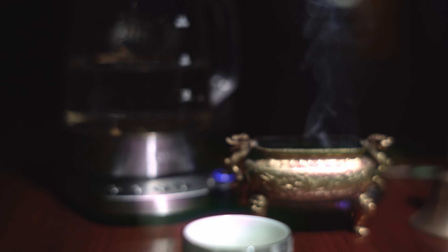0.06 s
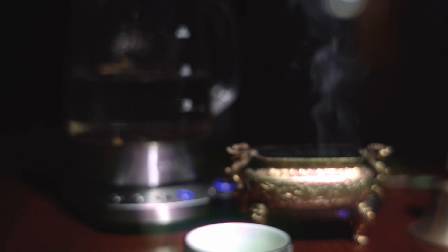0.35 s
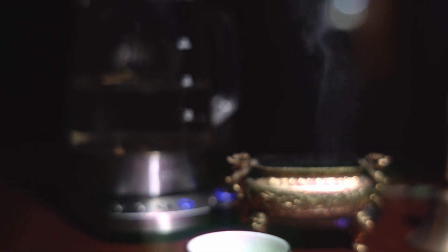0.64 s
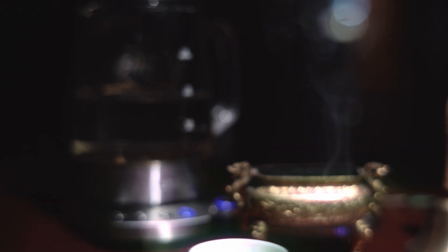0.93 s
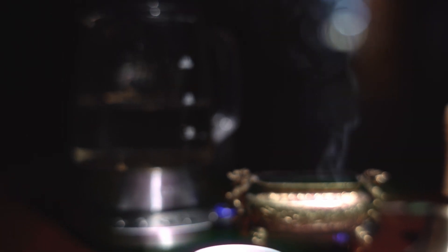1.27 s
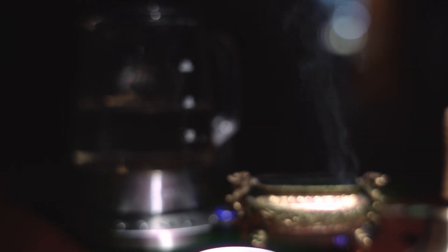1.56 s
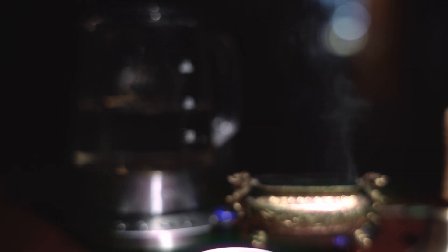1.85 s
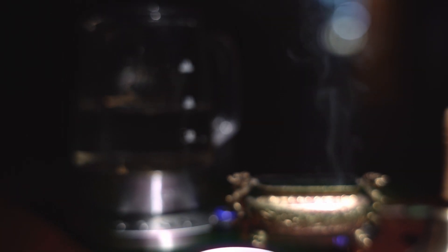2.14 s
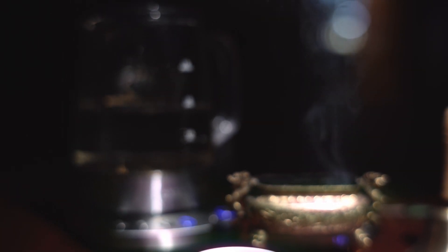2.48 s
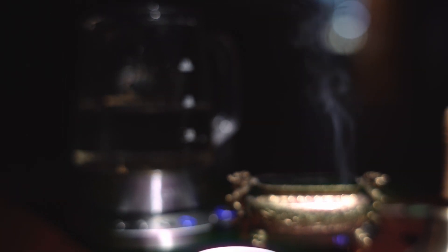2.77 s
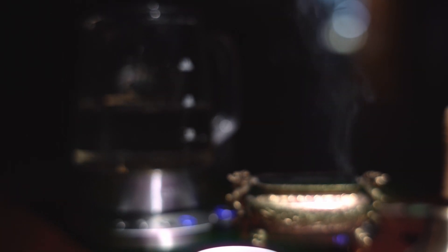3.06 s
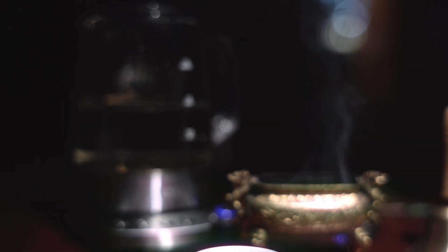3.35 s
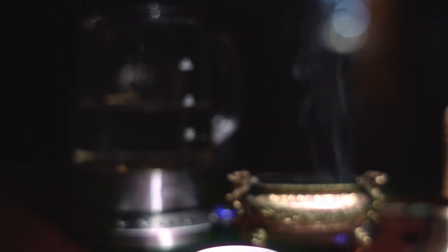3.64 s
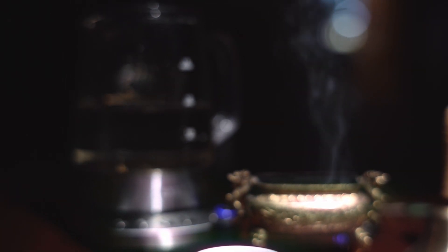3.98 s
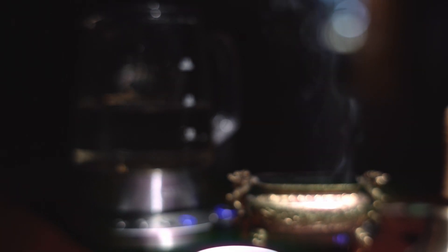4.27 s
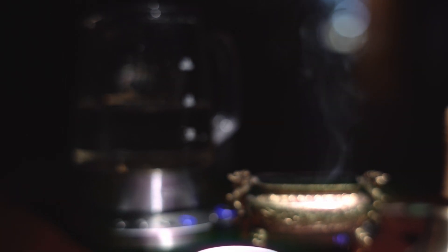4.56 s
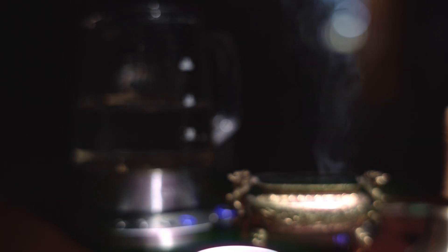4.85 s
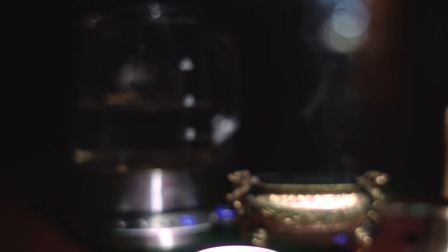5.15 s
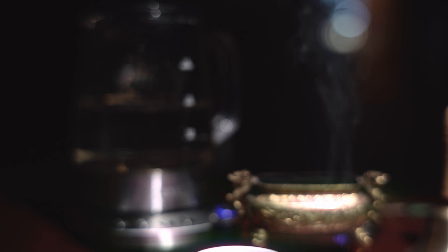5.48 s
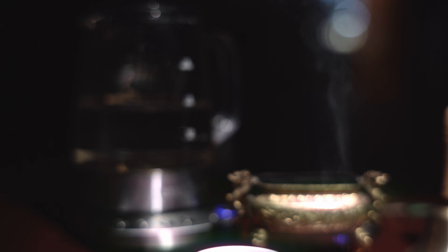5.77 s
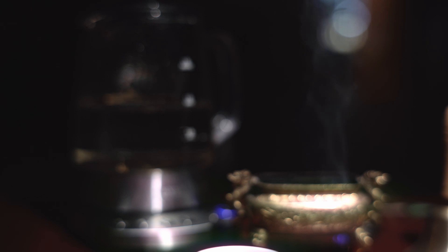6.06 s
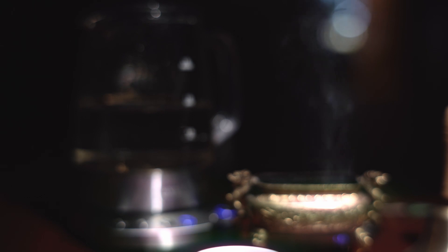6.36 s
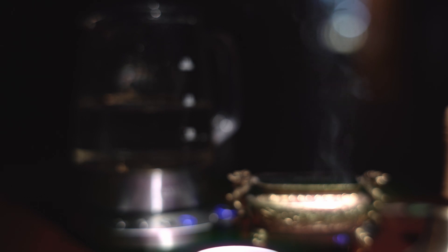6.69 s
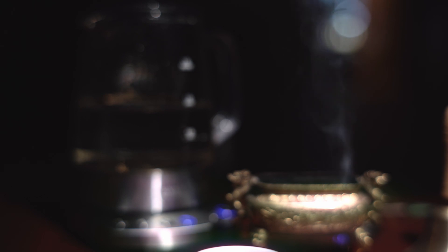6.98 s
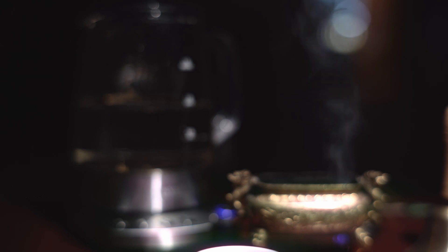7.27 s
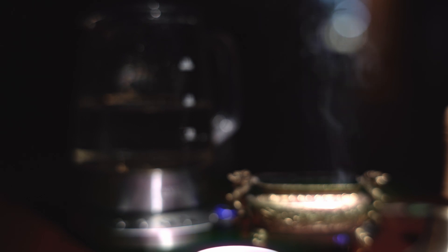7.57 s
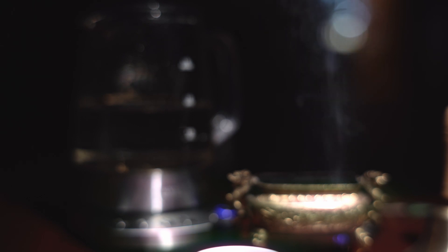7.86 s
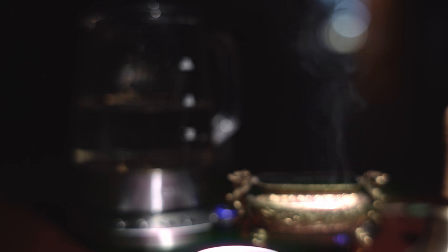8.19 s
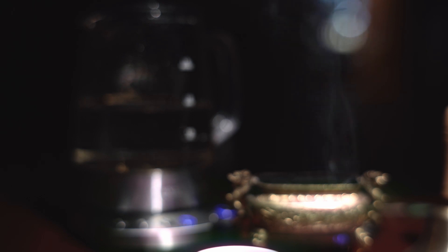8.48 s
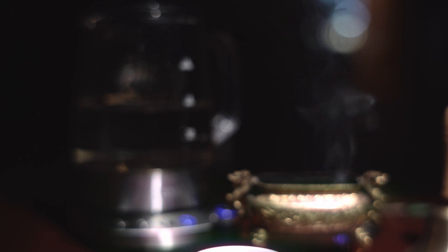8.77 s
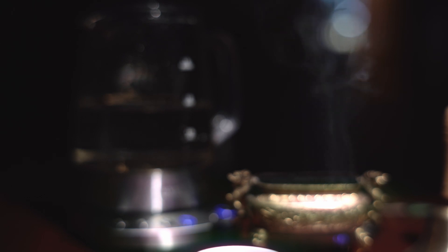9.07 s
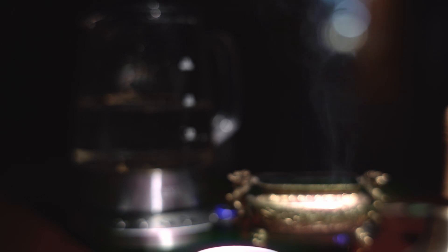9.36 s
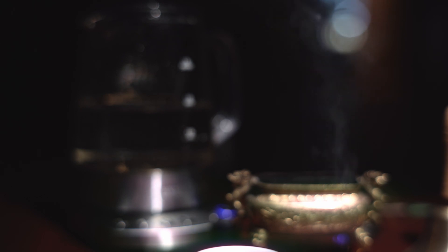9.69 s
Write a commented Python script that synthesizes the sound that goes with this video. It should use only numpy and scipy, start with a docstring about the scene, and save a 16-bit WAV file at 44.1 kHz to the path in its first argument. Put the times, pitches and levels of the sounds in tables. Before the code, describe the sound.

For the first two seconds there is only a quiet room: soft air, a faint hum and a slight low rumble that swells around one second. At about 2 seconds, water heating in a glass kettle starts a faint, rapid, even ticking, close by, which speeds up and peaks near 3 seconds. As it fades, a bright fizz of tiny bubbles and a softer, darker seething take over, rising quickly until 5 seconds and then more gradually. A cluster of small crisp knocks comes between 2.8 and 3.8 seconds. Later knocks are duller thuds, scattered irregularly, with stronger ones around 4.4, 5.9, 6.3 and 7.7 seconds. From about 7 seconds the simmer is full and nearly steady, lasting until the end just before 10 seconds. Everything rings slightly in the glass jug, with a short room reflection.

```python
"""Glass kettle coming to a simmer

Close up in a quiet room, one spot on the hot plate starts ticking evenly. Ever more steam bubbles
collapse in the cool water and build into a loud simmer: bright fizz, soft seething and dull knocks.
Every collapse is a click that rings through the same jug."""
import sys
import numpy as np
from scipy import signal
from scipy.fft import rfft, irfft, next_fast_len
from scipy.io import wavfile

SR = 44100
rng = np.random.default_rng(int(sys.argv[2]) if len(sys.argv) > 2 else 0)


def file_out(sig):
    """Save sig as 16-bit WAV at sys.argv[1]."""
    # one column per channel
    cols = np.atleast_2d(sig).T
    # limit, then scale
    lim = np.clip(cols, -1, 1)
    pcm = np.round(lim * 32767).astype(np.int16)
    wavfile.write(sys.argv[1], SR, pcm)


N = 429093


# the build of the simmer, driving fizz, seethe and lesser knocks: (time [s], level [dB])
SIMMER_BUILD = [(2.8, -60), (2.87, -60.5), (3.87, -44), (4.9, -37), (6.75, -32), (9.0, -30.5), (9.65, -31)]
# bright tone of a tiny collapse: (frequency [Hz], level [dB])
FIZZ_TONE = [(100, -15.5), (400, -9), (800, -5), (1500, -3), (2500, -1), (5000, -0.5), (15000, -2)]

def fizz(full_db=-30, full_per_s=9000, crowding=.65, gain_db=0.94, flutter_db=0.2):
    """Tiny bubbles collapse sharply; the louder the simmer, the more of them there are."""
    level_db = automation(SIMMER_BUILD)
    clicks = collapses(full_per_s * from_db(crowding * (level_db - full_db)), spread_db=2)
    envelope = from_db(level_db + gain_db + flutter_db * narrow_noise(0, 25)) * fade_in(2.7, 0.61)
    return play(clicks * envelope, jug_ring(FIZZ_TONE))


# darker tone of a larger collapse: (frequency [Hz], level [dB])
SEETHE_TONE = [(60, -3), (120, 4), (400, 1.5), (800, 1), (1500, 0), (2500, -4), (5000, -12.5), (15000, -21)]

def seethe(full_db=-30, full_per_s=1100, crowding=.6, gain_db=-4, follow=0.96, clump_db=2.5, clump_hz=60):
    """Larger bubbles collapse more softly and in clumps, giving the simmer its body."""
    vigour_db = automation(SIMMER_BUILD) - full_db
    clicks = collapses(full_per_s * from_db(crowding * vigour_db), spread_db=2.5)
    clumps = np.clip(narrow_noise(0, clump_hz), -2, 2)
    envelope = from_db(full_db + gain_db + follow * vigour_db + clump_db * clumps) * fade_in(2.85, 0.48)
    return play(clicks * envelope, jug_ring(SEETHE_TONE))


# crisp tone of a tick, also the crack of a knock: (frequency [Hz], level [dB])
TICK_TONE = [(200, -20), (600, -9), (800, 1), (1400, 0.5), (2050, -3), (2600, 1.5), (5200, -5.5),
             (7200, -2), (12000, 2)]
# plate resonances under the first boiling spot: (frequency [Hz], width [Hz], boost [dB])
PLATE_MODES = [(1240, 200, -0.5), (3060, 120, 5), (3660, 200, 9), (4280, 170, 8), (5470, 250, 13),
               (5850, 200, -6), (6410, 450, 12.5)]

def first_spot(start_s=1.95, attack_s=1.18, level_db=-58, decay_db_per_s=15,
               start_per_s=72, speedup_per_s2=88, jitter=.03, shatter_s=0.0024, sizzle_share=0.44):
    """One pit in the plate sheds bubble after bubble, faster as it heats; neighbours join in unevenly."""
    per_s = start_per_s + speedup_per_s2 * seconds_after(2.4)
    cycles = np.cumsum(per_s * (1 + jitter * narrow_noise(0, 30))) / SR
    ticks = np.diff(np.floor(cycles), prepend=0) * np.sqrt(SR / per_s)
    ticks *= from_db(1.5 * rng.standard_normal(N))
    neighbours = from_db(-6) * fade_in(2.64, 0.32) * collapses(per_s=200, spread_db=8)
    clicks = ticks + neighbours
    # each bubble shatters into a brief sizzle of fragments
    decay = np.exp(-1 / (shatter_s * SR))
    power = signal.lfilter([1 - decay], [1, -decay], clicks ** 2 + 1e-18)
    sizzle = np.sqrt(sizzle_share * power) * rng.standard_normal(N)
    bubbles = np.sqrt(1 - sizzle_share) * clicks + sizzle
    # the spot swells, then dies away as the rest of the plate takes over
    fall_db = decay_db_per_s * seconds_after(start_s + attack_s)
    envelope = fade_in(start_s, attack_s) * from_db(level_db - fall_db)
    return play(bubbles * envelope, jug_ring(TICK_TONE, PLATE_MODES))


# big collapses that punch through the simmer: (time [s], peak before fading [dB])
KNOCK_CUES = [(2.796, -47.5), (2.862, -49), (3.024, -39.5), (3.159, -41), (3.411, -37), (3.468, -34.5),
              (3.5, -35), (3.618, -35), (3.661, -28.5), (3.802, -27.5), (3.818, -28), (4.367, -23),
              (4.384, -22.5), (5.902, -18), (6.287, -19), (7.643, -18), (7.7, -16)]
# dull tone of a big collapse: (frequency [Hz], level [dB])
KNOCK_TONE = [(100, 4), (250, 2), (550, -2.5), (900, 3), (1600, -5.5), (3000, -5), (8000, -23)]

def knocks(lesser_count=45, thud_fade_db=-1.5, crack_fade_db=-16,
           pulses=3, rebound_s=.0022, rebound_db=-6):
    """A big bubble collapses with a crack and a dull thud, then rebounds, weaker each time."""
    # lesser knocks fall at random, peaking a little over the simmer
    when, softness = rng.random((lesser_count, 2)).T
    times = 2.9 + when * (N / SR - 2.9)
    peaks_db = np.interp(times, *np.transpose(SIMMER_BUILD)) + 10.5 - 4.5 * softness
    clicks = np.zeros(N)
    for start_s, peak_db in [*zip(times, peaks_db), *KNOCK_CUES]:
        gaps_s = rebound_s * rng.uniform(0.48, 1.487, pulses)
        at = ((start_s + np.cumsum(gaps_s) - gaps_s[0]) * SR).astype(int)
        clicks[np.minimum(at, N - 1)] += from_db(peak_db + rebound_db * np.arange(pulses))
    # as the simmer builds, knocks turn duller: the crack fades, the thud softens slightly
    build = fade_in(2.74, 1.2)
    thud, crack = jug_ring(KNOCK_TONE), jug_ring(TICK_TONE, PLATE_MODES)
    thuds = play(clicks * from_db(thud_fade_db * build), thud / np.abs(thud).max())
    cracks = play(clicks * from_db(crack_fade_db * build), crack / np.abs(crack).max())
    return thuds + cracks


# broad EQ of the sound the jug radiates: (frequency [Hz], level [dB])
JUG_TONE = [(40, -43), (70, -21), (110, -14), (160, -5.5), (300, -8), (800, -9.5), (1300, -8), (1800, 0),
            (3500, -1.7), (6700, -4), (7100, -9), (8500, -13), (10000, -22.5), (15500, -35.5)]
# resonances of the jug and its water: (frequency [Hz], width [Hz], boost [dB])
JUG_RESONANCES = [(374, 50, 12), (413, 29, 5), (514, 93, 7), (577, 110, 7), (663, 44, 5), (774, 131, 8),
                  (874, 141, 8), (973, 148, 8), (1116, 161, 7), (1224, 95, 6), (1300, 135, 11.5),
                  (1456, 84, 9), (1645, 90, 4), (2050, 158, 5), (2468, 89, 7), (3022, 95, 8.5),
                  (3141, 73, 3), (3855, 106, 4), (4324, 350, 3), (4490, 355, 5), (4867, 169, 3),
                  (5028, 90, 5), (6108, 300, 4.5), (6590, 230, 5), (8910, 51, 3), (11602, 271, 4),
                  (12977, 199, 5)]
# echoes inside the plate and the water: (round trip [s], feedback [ratio])
INNER_ECHOES = [(.00017, 0.59), (.00041, 0.59), (.00073, .5), (.00113, 0.31)]

def jug_ring(tone, extra_modes=()):
    """One collapse rings through the jug's resonances; unit energy."""
    ring = signal.fftconvolve(eq_impulse(tone), eq_impulse(JUG_TONE))
    for hz, width_hz, boost_db in [*JUG_RESONANCES, *extra_modes]:
        boost = from_db(boost_db / 2)
        damping = np.pi * width_hz / SR
        tuning = -2 * np.cos(2 * np.pi * hz / SR)
        ring = signal.lfilter([1 + damping * boost, tuning, 1 - damping * boost],
                              [1 + damping / boost, tuning, 1 - damping / boost], ring)
    # all-pass echoes smear the click over a few milliseconds without colouring it
    for trip_s, feedback in INNER_ECHOES:
        loop = np.r_[1, np.zeros(int(trip_s * SR)), feedback]
        ring = signal.lfilter(loop[::-1], loop, ring)
    return ring / np.linalg.norm(ring)


def reflections(sound, t60_s=0.61, wet_db=-15, predelay_s=0.0059):
    """The table and the walls return a short diffuse tail."""
    t = np.arange(SR // 2) / SR
    tail = rng.standard_normal(len(t)) * from_db(-60 * t / t60_s) * (t > predelay_s)
    return from_db(wet_db) * play(sound, tail / np.linalg.norm(tail))


# bass-heavy bed of room air: (frequency [Hz], relative level [dB])
AIR_TONE = [(36, -30), (62, -3.5), (124, -11.5), (197, -17.5), (232, -11), (260, -13.5), (432, -20),
            (463, -19.5), (752, -24), (1170, -25.5), (6610, -28.5), (13800, -32.5), (15500, -32.5)]
# faint low hums and high whines: (frequency [Hz], width [Hz], level [dB])
ROOM_HUMS = [(100.5, 3, -88), (164, 8, -82), (11994, 250, -88), (13690, 220, -84)]

def room_tone(air_db=-68, rumble_db=-75.5, swell_db=7, swell_at_s=0.83, swell_width_s=.4):
    """Soft air, a low rumble that swells once, and faint hums."""
    air = from_db(air_db) * unit_power(play(rng.standard_normal(N), eq_impulse(AIR_TONE)))
    swell = np.exp(-((np.arange(N) / SR - swell_at_s) / swell_width_s) ** 2)
    rumble = from_db(rumble_db + swell_db * swell) * narrow_noise(hz=51, width_hz=8)
    hums = sum(from_db(db) * narrow_noise(hz, width_hz) for hz, width_hz, db in ROOM_HUMS)
    return air + rumble + hums


def collapses(per_s, spread_db):
    """Clicks at random moments and of random sizes; unit power at any rate."""
    chance = np.clip(per_s / SR, 1e-6, 1)
    sizes = unit_power(from_db(spread_db * np.clip(rng.standard_normal(N), -2, 2)))
    polarity = rng.choice([-1, 1], N)
    return (rng.random(N) < chance) * sizes * polarity / np.sqrt(chance)


def narrow_noise(hz, width_hz):
    """Noise gathered round one frequency; round 0 Hz it is a random drift."""
    size = next_fast_len(N)
    f = np.arange(size // 2 + 1) * SR / size
    spectrum = rfft(rng.standard_normal(size)) / (1 + ((f - hz) / width_hz) ** 2)
    return unit_power(irfft(spectrum, size)[:N])


def eq_impulse(curve, size=4096):
    """The minimum-phase impulse response of an EQ curve."""
    hz, db = np.transpose(curve)
    f = np.maximum(np.arange(size // 2 + 1) * SR / size, 1)
    gain = from_db(np.interp(np.log(f), np.log(hz), db))
    cepstrum = irfft(np.log(gain))
    cepstrum[1:size // 2] *= 2
    cepstrum[size // 2 + 1:] = 0
    return irfft(np.exp(rfft(cepstrum)))


def play(excitation, ring):
    """Every sample of the excitation starts the same ring."""
    return signal.oaconvolve(excitation, ring)[:N]


def automation(points):
    """A line through (time, value) points, sample by sample."""
    return np.interp(np.arange(N) / SR, *np.transpose(points))


def fade_in(start_s, length_s):
    """A straight rise from silence to full."""
    return np.minimum(seconds_after(start_s) / length_s, 1)


def seconds_after(start_s):
    """Time since a cue; zero before it."""
    return np.maximum(np.arange(N) / SR - start_s, 0)


def from_db(db):
    """Decibels to gain."""
    return 10 ** (np.asarray(db) / 20)


def unit_power(x):
    """Scale to an RMS of one."""
    return x / np.sqrt(np.mean(x ** 2) + 1e-20)


def scene():
    """The kettle in its room, alike in both channels."""
    kettle = first_spot() + fizz() + seethe() + knocks()
    return np.tile(kettle + reflections(kettle) + room_tone(), (2, 1))


def record(dry, cutoff_hz=15720):
    """A steep low-pass takes off the very top."""
    return signal.sosfilt(signal.ellip(14, .1, 80, cutoff_hz, fs=SR, output="sos"), dry)


dry = scene()
out = record(dry)
file_out(out)
```